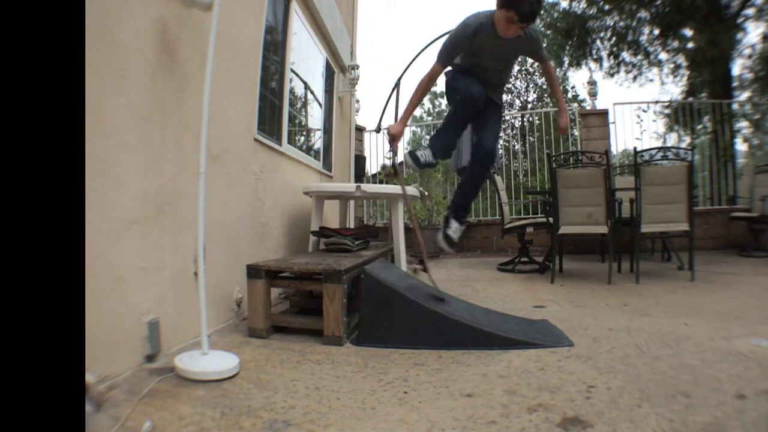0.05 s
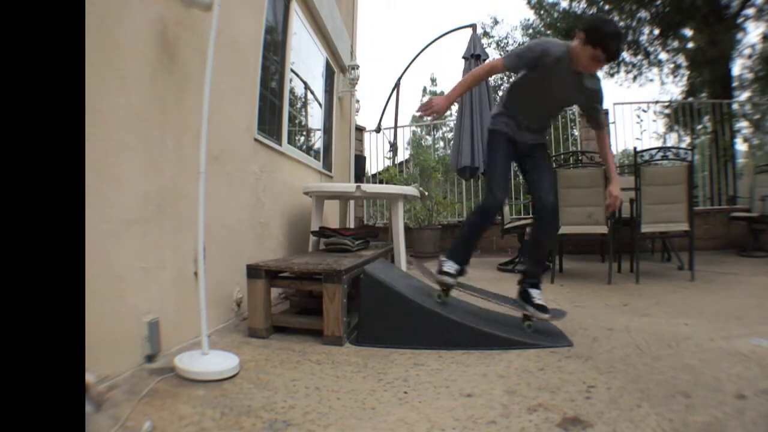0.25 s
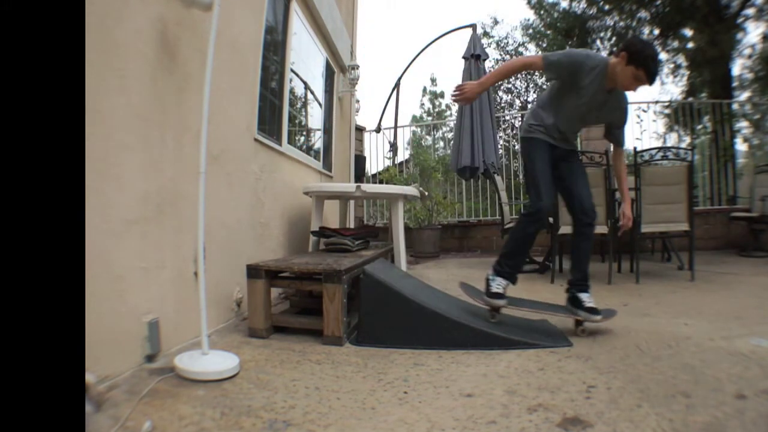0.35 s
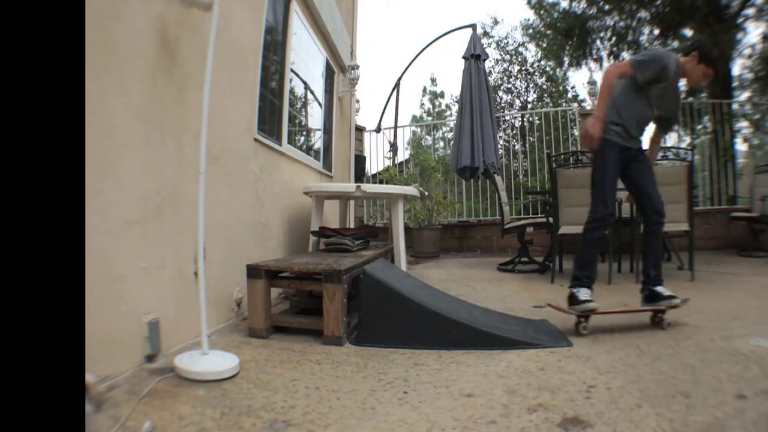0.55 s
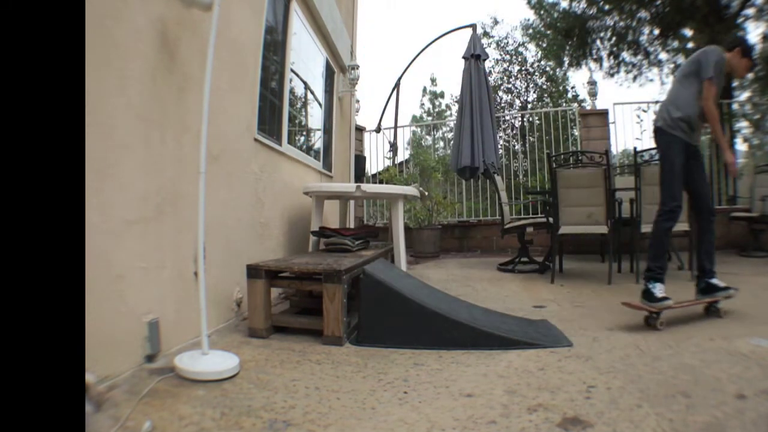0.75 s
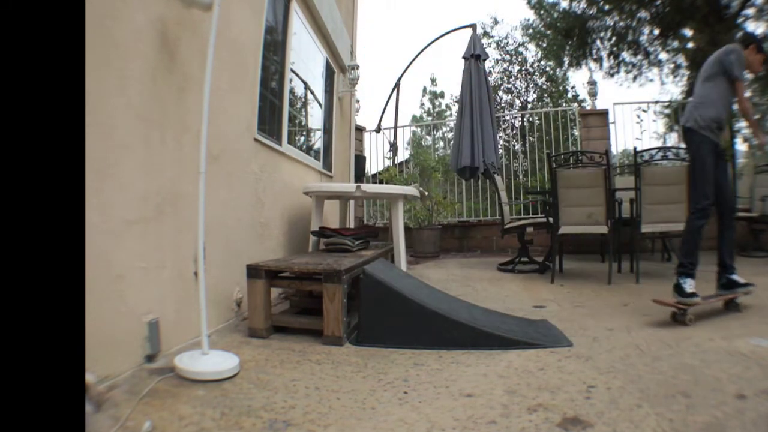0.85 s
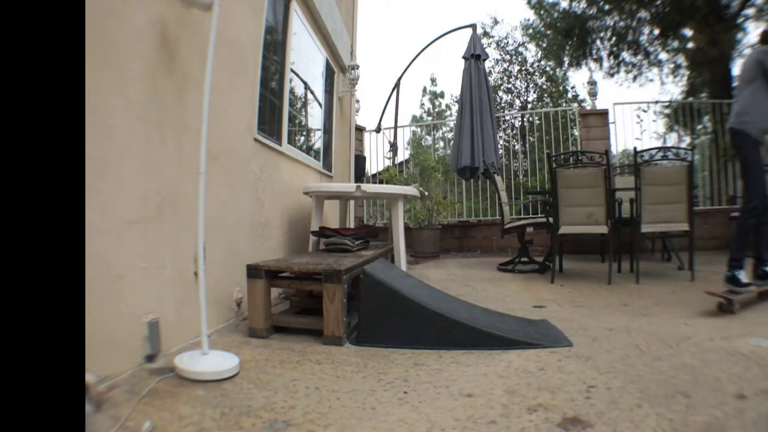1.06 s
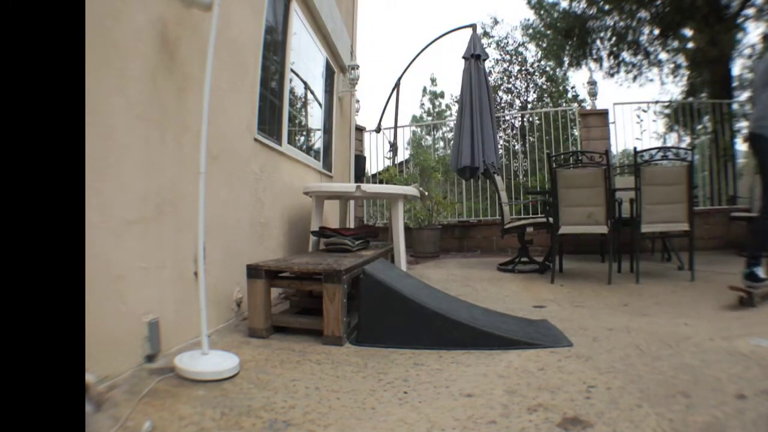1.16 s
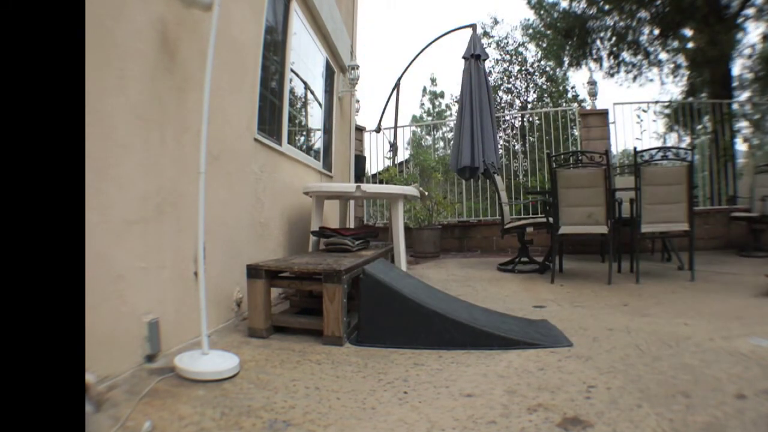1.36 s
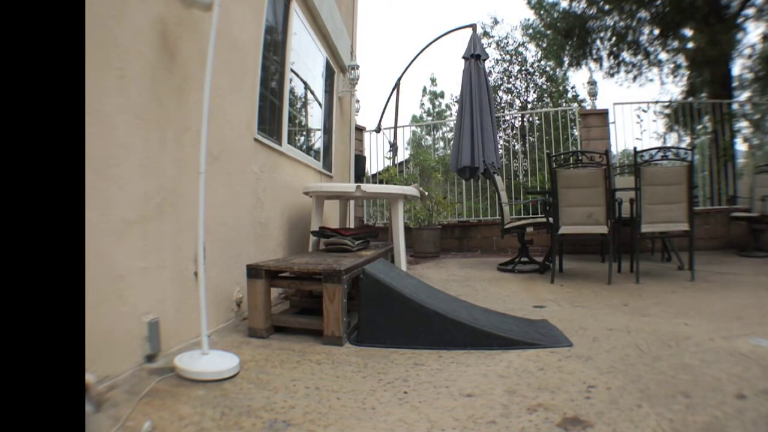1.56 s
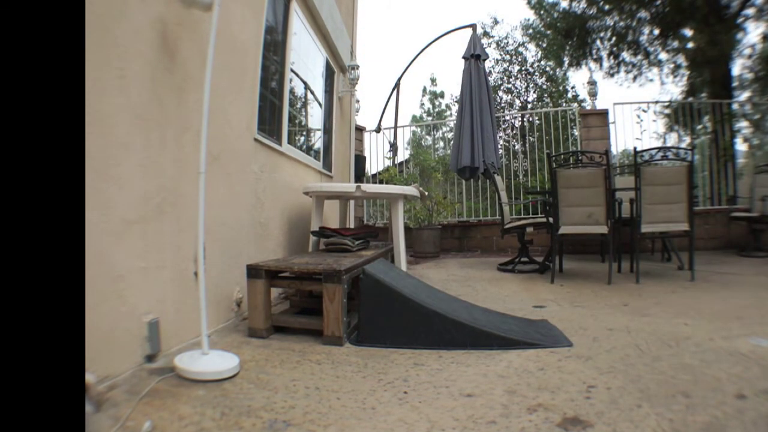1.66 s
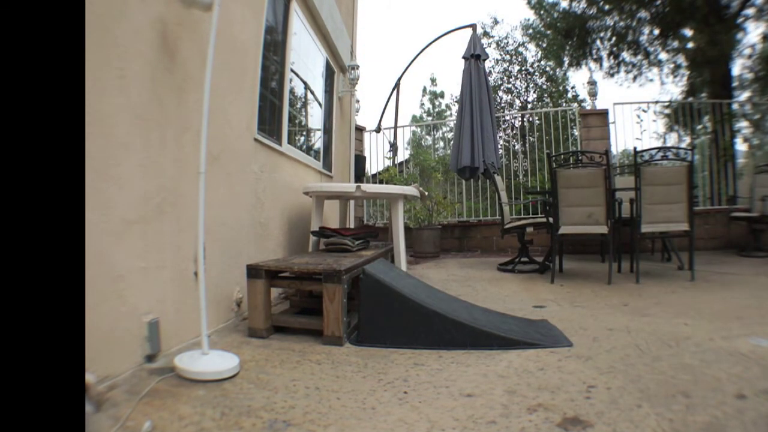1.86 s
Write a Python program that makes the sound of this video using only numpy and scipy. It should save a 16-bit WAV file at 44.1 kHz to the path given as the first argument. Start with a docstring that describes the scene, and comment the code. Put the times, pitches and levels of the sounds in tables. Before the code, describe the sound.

Skateboard slamming onto a ramp and rumbling off across a patio, knocking again further away.

```python
"""A walled patio: a skater jumps onto his board on a small hollow ramp. Tail, wheels and feet slam
down in a quick clatter, each blow ringing the ramp, the plywood deck and the metal trucks. The wheels
drop off the lip and rumble away to the right over rough concrete. Shoes scuff, and the board knocks
again further off. Walls and ground reflect it all, over faint outdoor air."""
import sys
import numpy as np
from scipy import signal
from scipy.fft import rfft, irfft
from scipy.io import wavfile
from scipy.ndimage import uniform_filter1d

SR = 44100
rng = np.random.default_rng(int(sys.argv[2]) if len(sys.argv) > 2 else 0)


def unload_wav(signal):
    """Save mono or channel-first audio to the path in sys.argv[1] as 16-bit WAV at rate SR, clipped to [-1, 1]."""
    wavfile.write(
        sys.argv[1],
        SR,
        np.round(np.clip(np.atleast_2d(signal).T, -1, 1) * 32767).astype(np.int16),
    )


N = 83790
T = np.arange(N) / SR


# Each row: start in seconds, then thud, boom, clack, click and ramp ring levels in dB.
RAMP_BLOWS = [(0.021, -46, -33, -34.5, -46, -56), (0.033, -37, -29.5, -32.5, -46, -66),
              (0.046, -39, -41, -40, -45, -41), (0.0925, -38, -23, -44, -60, -58),
              (0.122, -35, -36, -59, -41, -55), (0.163, -43, -29, -27, -43, -52),
              (0.182, -44, -29.5, -47, -58, -49), (0.240, -23.5, -5, -11, -21.5, -33),
              (0.247, -45, -15, -22, -31, -21), (0.2645, -28, -14, -11.5, -23.5, -23),
              (0.2695, -26, -3, -4.5, -21.5, -5.5), (0.290, -29.5, -15, -14, -30, -7),
              (0.301, -19, -11, -10, -20.5, -16), (0.3055, -25, -12, -8, -17.5, -11.5),
              (0.318, -22, -9.5, -12.5, -20, -8), (0.329, -21, -6.5, -12, -29, -27),
              (0.3355, -39, -22, -17, -20, -13.5), (0.346, -32, -7, -17, -25, -15.5),
              (0.365, -36, -6, -18, -32, -27), (0.375, -32, -23, -17, -40, -23),
              (0.409, -48, -24, -20, -50, -43), (0.421, -33, -45, -34, -50, -27),
              (0.440, -42, -22, -18, -40, -25.5), (0.459, -38, -16, -48, -43, -39),
              (0.477, -43, -18, -30.5, -56, -42), (0.578, -52, -32, -26, -57, -34),
              (0.5995, -28.5, -16.5, -20.5, -33.5, -24), (0.609, -32, -24, -20, -33.5, -35),
              (0.630, -31, -16.5, -21.5, -34, -28), (0.641, -41, -22.5, -35, -39, -47)]
# Each row: frequency in Hz, level in dB, T60 in seconds.
RAMP_MODES = [(351.2, -2, .16), (694, -1.5, .12), (738.6, 0, .12), (761, -6.5, 0.29), (1140, -19, 0.084)]

def ramp_clatter():
    """Tail, wheels and feet slam down and ring the ramp's hollow shell."""
    return knocks(RAMP_BLOWS, RAMP_MODES)


# Each row: start in seconds, then thud, boom, clack, click and deck ring levels in dB.
GROUND_KNOCKS = [(0.783, -71, -32, -31, -43.5, -38), (1.013, -46.5, -40, -32, -40, -55),
                 (1.179, -58, -41, -32, -56, -48), (1.243, -47, -26, -46, -49, -56),
                 (1.357, -64, -43, -31, -45, -62), (1.4705, -64, -50, -39, -38, -55),
                 (1.481, -55, -35, -30, -36, -37), (1.514, -63, -30.5, -23, -31.5, -24),
                 (1.521, -55, -24.5, -22, -29.5, -16), (1.548, -56, -22, -37, -54, -43),
                 (1.624, -72, -48, -43, -49, -41), (1.657, -64, -41, -37, -37, -43),
                 (1.7735, -52, -48, -21.5, -28, -24), (1.779, -38.5, -36, -21.5, -29, -24),
                 (1.7875, -63, -34, -32, -37, -35), (1.805, -72, -44, -24, -46, -49)]
# Each row: frequency in Hz, level in dB, T60 in seconds.
FREE_DECK_MODES = [(364.3, -5, 0.11), (537, -3, 0.18), (834, -5, .08), (931, 2.5, 0.12), (1105, -7, 0.046),
                   (1589, -2, 0.066), (1798, -5.5, .08), (4040, -28, .05)]

def ground_knocks():
    """The board knocks on concrete and its deck rings freely."""
    return knocks(GROUND_KNOCKS, FREE_DECK_MODES)


def knocks(blows, ring_modes):
    """Each blow sounds the wood, the trucks and the clear modes of the struck body."""
    start_s, thud_db, boom_db, clack_db, click_db, ring_db = np.transpose(blows)
    wood = hollow_thud(start_s, thud_db) + low_boom(start_s, boom_db) + deck_clack(start_s, clack_db)
    return wood + truck_click(start_s, click_db) + modal_ring(start_s, ring_db, ring_modes)


# Each row: frequency in Hz, relative density in dB.
THUD_SPECTRUM = [(25, -32), (55, -6), (100, -24), (135, 3), (170, -3.5), (220, -2), (320, -0.5), (600, -66)]

def hollow_thud(start_s, level_db):
    """Short-lived bass modes give a blow its hollow weight."""
    thud = dense_ring(start_s, level_db, THUD_SPECTRUM, t60_s=0.1)
    return low_cut(thud, hz=77, order=2)


# Each row: frequency in Hz, level in dB, T60 in seconds.
BOOM_MODES = [(269, -20, 0.3), (302.6, -4.5, 0.13), (347, 0, 0.13), (405.4, -2.5, 0.15), (460, -4, 0.093),
              (478.6, -2, 0.044), (521.4, -7, 0.23)]
# Each row: frequency in Hz, relative density in dB.
BOOM_SPECTRUM = [(100, -47), (220, -19), (330, -2), (450, -3), (560, -2), (800, -36), (1600, -96)]

def low_boom(start_s, level_db):
    """Board and ramp ring in their low modes."""
    clear = modal_ring(start_s, level_db - 2, BOOM_MODES)
    dense = dense_ring(start_s, level_db - 3.5, BOOM_SPECTRUM, t60_s=0.078)
    low_pass = signal.butter(4, 678, fs=SR, output="sos")
    return signal.sosfilt(low_pass, clear + low_cut(dense, hz=164))


# Each row: frequency in Hz, level in dB, T60 in seconds.
CLACK_MODES = [(704.6, 6, 0.048), (717, -5, 0.04), (762.4, -4.5, 0.066), (814, 13.5, 0.029),
               (894, -3, 0.069), (936, -5.5, 0.24), (1033, -4, 0.1), (1124, -20.5, 0.033),
               (1270, -20.5, 0.023), (1555, -4, 0.07), (1650, -35, 0.02), (1997, -10, .06),
               (2157, -5, 0.04)]
# Each row: frequency in Hz, relative density in dB.
DECK_SPECTRUM = [(300, -32), (600, -6.5), (750, 1.5), (1150, -0.5), (1400, -16), (1700, -6), (2100, -15),
                 (2400, -27.5), (2800, -14.5), (4500, -46)]

def deck_clack(start_s, level_db):
    """The plywood deck rings briefly in the midrange."""
    clear = modal_ring(start_s, level_db - 4, CLACK_MODES)
    dense = dense_ring(start_s, level_db - 2, DECK_SPECTRUM, t60_s=0.08)
    return clear + low_cut(dense, hz=428)


# Each row: frequency in Hz, relative density in dB.
CLICK_SPECTRUM = [(1200, 16), (2400, -13), (2750, -1), (3450, -6), (4100, 3), (5500, -3), (8000, -9),
                  (13500, -20.5)]
CRACK_SPECTRUM = [(600, -10), (2000, -2.5), (5000, 3), (9000, -6.5), (14000, -12)]
# Each row: centre in Hz, width in Hz, lift in dB.
TRUCK_PEAKS = [(2520, 200, 3), (3910, 310, 6.5)]

def truck_click(start_s, level_db):
    """Hard contact cracks for an instant and the metal trucks ring on."""
    click = dense_ring(start_s, level_db, CLICK_SPECTRUM, t60_s=0.097)
    crack = dense_ring(start_s, level_db + 3, CRACK_SPECTRUM, t60_s=0.015)
    return low_cut(resonate(click + crack, TRUCK_PEAKS), hz=925)


def dense_ring(start_s, level_db, spectrum, t60_s, attack_s=0.00045):
    """Each blow wakes a crowd of close modes that die together, like decaying noise."""
    power = 0
    for onset_s, db in zip(start_s, level_db):
        age_s = np.maximum(T - onset_s, 0)
        envelope = from_db(db - 60 * age_s / t60_s) * (1 - np.exp(-age_s / attack_s))
        power = power + envelope ** 2
    noise = coloured(rng.standard_normal((2, N)), spectrum)
    local_rms = np.sqrt(uniform_filter1d(np.mean(noise ** 2, axis=0), size=600) + 1e-9)
    return np.sqrt(power) * noise / local_rms


def modal_ring(start_s, level_db, modes):
    """Each blow strikes every clear mode with a strength of its own."""
    ring = np.zeros(N)
    scatter_db = 1.12 * rng.standard_normal((len(start_s), len(modes)))
    for k, (hz, mode_db, t60_s) in enumerate(modes):
        strikes = np.zeros(N)
        strikes[(start_s * SR).astype(int)] = from_db(level_db + mode_db + scatter_db[:, k])
        radius, step_rad = from_db(-60 / (t60_s * SR)), 2 * np.pi * hz / SR
        feedback = [1, -2 * radius * np.cos(step_rad), radius * radius]
        ring += (-1) ** k * signal.lfilter([0, np.sin(step_rad)], feedback, strikes + 1e-18)
    return low_cut(ring, hz=modes[0][0] * 0.73) / np.sqrt(len(modes) / 2)


# Each row: frequency in Hz, relative density in dB.
RUMBLE_SPECTRUM = [(30, -42), (105, -37), (140, -11), (200, -5.5), (270, -5), (360, -2), (520, -0.5),
                   (620, -8.5), (760, 1), (950, -2), (1170, -4), (1400, -14.5), (1800, -6), (2050, -20.5),
                   (2400, -28), (2800, -20), (3450, -32), (4200, -27), (8000, -35), (14000, -42.5)]
# Each row: centre in Hz, width in Hz, lift in dB.
WHEEL_AND_TRUCK_PEAKS = [(377, 56, 1), (532, 13, 4.5), (690, 80, 3.5), (937, 20, 5), (1126, 30, 1),
                         (1816, 410, 2), (3860, 300, 7.5)]
# Each row: time in seconds, level in dB.
ROLL_LEVEL = [(0, -49), (.25, -42.5), (.33, -14.5), (.47, -44.5), (.55, -38), (.66, -29), (.74, -35),
              (.82, -36.5), (.92, -39.5), (1.08, -36), (1.2, -34.5), (1.42, -35), (1.53, -36.5),
              (1.66, -35), (1.74, -48), (1.78, -39), (1.82, -42), (1.9, -38.5)]
# Each row: time in seconds, bass lift in dB.
ROLL_BASS = [(0, 0), (.5, 1), (.7, 2), (.9, -2), (1.15, 0), (1.28, 3), (1.45, -2), (1.7, -3), (1.9, -3)]

def wheels(bass_hz=520):
    """Grit under the wheels shakes the board and its resonances; the bass swells and thins."""
    grit = grains(per_s=6000, spread_db=2.0)
    rumble = unit_rms(resonate(coloured(grit, RUMBLE_SPECTRUM), WHEEL_AND_TRUCK_PEAKS))
    bass = signal.sosfiltfilt(signal.butter(3, bass_hz, fs=SR, output="sos"), rumble)
    bass_gain = from_db(np.interp(T, *np.transpose(ROLL_BASS)))
    gain = from_db(np.interp(T, *np.transpose(ROLL_LEVEL)))
    return gain * (rumble + (bass_gain - 1) * bass)


# Each row: start, rise and fall in seconds, then hiss and rasp levels in dB.
SCRAPES = [(0.058, 0.083, 0.073, -40.5, -45), (.15, 0.034, 0.045, -57, -37), (.37, 0.057, 0.057, -39, -65),
           (1.456, 0.035, 0.053, -44.5, -30), (1.574, 0.036, 0.098, -35, -32)]
# Each row: frequency in Hz, relative density in dB.
HISS_SPECTRUM = [(900, -37), (2000, 10.5), (2400, -7.5), (2800, -0.5), (3450, -8.5), (4100, 2),
                 (5500, -1.5), (8000, -4.5), (13500, -13)]

def scrapes():
    """Soles and board slide in tiny slips: a gritty hiss and a rasp from the deck."""
    slips = grains(per_s=5000, spread_db=2.5)
    hiss = unit_rms(resonate(coloured(slips, HISS_SPECTRUM), TRUCK_PEAKS))
    rasp = coloured(slips, DECK_SPECTRUM)
    scuffs = 0
    for start_s, rise_s, fall_s, hiss_db, rasp_db in SCRAPES:
        pressure = np.interp(T, [start_s, start_s + rise_s, start_s + rise_s + fall_s], [0, 1, 0])
        scuffs = scuffs + pressure * (from_db(hiss_db) * hiss + from_db(rasp_db) * rasp)
    return scuffs


# Each row: time in seconds, left-ear lag in ms, left minus right in dB.
BOARD_PATH = [(0, -0.037, 1.5), (.3, 0.005, 0.4), (0.602, 0.072, 1), (1.1, 0.16, -0.5), (1.9, 0.15, -0.2)]

def travel(board):
    """The board moves from near the middle to the right."""
    time_s, lag_ms, pan_db = np.transpose(BOARD_PATH)
    lag_s = np.interp(T, time_s, lag_ms) / 1000
    left_gain = from_db(np.interp(T, time_s, pan_db) / 2)
    return np.array([delayed(board[0], lag_s) * left_gain, board[1] / left_gain])


# Each row: delay in seconds, level in dB.
NEAR_ECHOES = [(.0085, -22.5), (.031, -16.5)]
# Each row: frequency in Hz, level in dB, T60 in seconds.
PATIO_REVERB = [(101, -19.5, 0.34), (324, -8, 0.59), (890, -12.5, 0.98), (2500, -9, 0.29),
                (6000, -7.5, 0.54), (14000, -7, 0.21)]

def patio(board, build_s=0.0069):
    """House wall and ground reflect the board; a diffuse tail dies band by band."""
    age_s = T[:SR]
    hz, noise_spectra = stereo_spectra(rng.standard_normal((2, SR)))
    edges_hz = np.geomspace(40, 20000, 13)
    tail = 0
    for low_hz, high_hz in zip(edges_hz, edges_hz[1:]):
        centre_hz = np.sqrt(low_hz * high_hz)
        gain = from_db(at_hz(PATIO_REVERB, centre_hz))
        t60_s = at_hz(PATIO_REVERB, centre_hz, column=2)
        fade = from_db(-60 * age_s / t60_s) * (1 - np.exp(-age_s / build_s))
        band = irfft(noise_spectra * ((hz >= low_hz) & (hz < high_hz)), SR)
        tail = tail + gain * band * fade / np.sqrt(2 * np.sum(fade ** 2))
    echoes = 0
    for delay_s, db in NEAR_ECHOES:
        echoes = echoes + from_db(db) * np.array([delayed(side, delay_s) for side in board])
    return echoes + signal.fftconvolve(board, tail, axes=1)[:, :N]


# Each row: frequency in Hz, relative density in dB.
AIR_SPECTRUM = [(20, 23), (60, -12), (110, -26), (300, -27), (900, 1.5), (2500, -4), (6000, -2.5),
                (14000, -13)]

def outdoor_air(level_db=-58.5):
    """Faint, steady outdoor noise."""
    return from_db(level_db) * coloured(rng.standard_normal((2, N)), AIR_SPECTRUM)


# Each row: frequency in Hz, left-right coherence from 0 to 1.
COHERENCE = [(40, 0.93), (200, 1), (400, .97), (700, 0.86), (1300, 0.4), (2500, 0.48), (12000, 0)]

def stereo_spectra(pair):
    """Frequencies and left and right spectra of two unrelated signals, mixed to be alike in the bass."""
    hz = np.fft.rfftfreq(pair.shape[1], 1 / SR)
    mid, side = rfft(pair)
    alike = np.clip(at_hz(COHERENCE, hz), 0, 1)
    return hz, np.sqrt(1 + alike) * mid + np.sqrt(1 - alike) * side * [[1], [-1]]


def coloured(pair, spectrum):
    """Stereo sound of unit power with the given spectrum."""
    hz, spectra = stereo_spectra(pair)
    return unit_rms(irfft(spectra * from_db(at_hz(spectrum, hz)), pair.shape[1]))


def grains(per_s, spread_db):
    """Two streams of tiny random contacts of uneven size."""
    size = from_db(spread_db * np.minimum(rng.exponential(1, (2, N)), 5))
    return size * rng.choice([-1, 1], (2, N)) * (rng.random((2, N)) < per_s / SR)


def resonate(x, peaks):
    """Lift narrow bands."""
    for hz, width_hz, lift_db in peaks:
        band = signal.lfilter(*signal.iirpeak(hz, hz / width_hz, fs=SR), x)
        x = x + (from_db(lift_db) - 1) * band
    return x


def low_cut(x, hz, order=4):
    """High-pass: a small body radiates no bass."""
    return signal.sosfilt(signal.butter(order, hz, "high", fs=SR, output="sos"), x + 1e-18)


def delayed(x, delay_s):
    """Fractional delay."""
    return np.interp(T - delay_s, T, x, left=0, right=0)


def at_hz(rows, hz, column=1):
    """Read a table column on a log-frequency axis."""
    table = np.array(rows)
    return np.interp(np.log(hz + 1e-9), np.log(table[:, 0]), table[:, column])


def from_db(db):
    """Decibels to gain."""
    return 10 ** (np.asarray(db) / 20)


def unit_rms(x):
    """Scale to unit power."""
    return x / np.sqrt(np.mean(x ** 2) + 1e-20)


def scene():
    """The board in the patio, over faint outdoor air."""
    board = ramp_clatter() + ground_knocks() + wheels() + scrapes()
    return travel(board) + patio(board) + outdoor_air()


# Each row: frequency in Hz, left minus right in dB.
MIC_BALANCE = [(100, -0.5), (450, -1), (1000, -1), (2000, -1), (4000, 1), (8000, 0.5), (13000, 2.5)]

def record(dry, ceiling=0.99, cutoff_hz=14300):
    """Two microphones of slightly unlike colour; loud peaks are rounded and the top is cut."""
    tilt_db = at_hz(MIC_BALANCE, np.fft.rfftfreq(2 * N, 1 / SR))
    heard = irfft(rfft(dry, 2 * N) * from_db([tilt_db / 2, -tilt_db / 2]))[:, :N]
    top_cut = signal.ellip(10, .3, 80, cutoff_hz, fs=SR, output="sos")
    return signal.sosfilt(top_cut, ceiling * np.tanh(heard / ceiling))


dry = scene()
out = record(dry)
unload_wav(out)
```